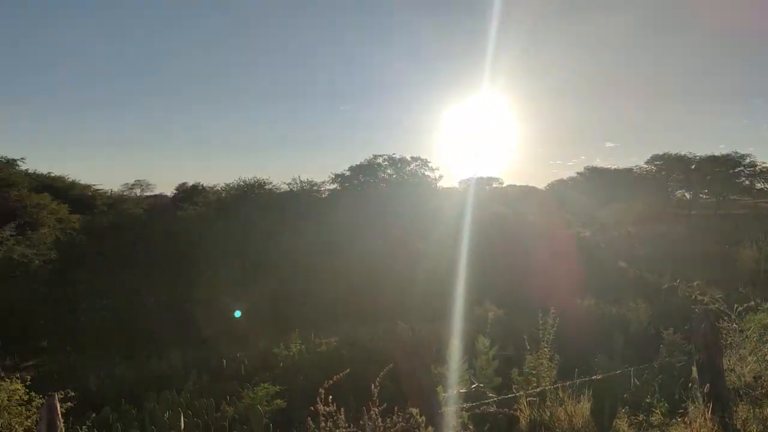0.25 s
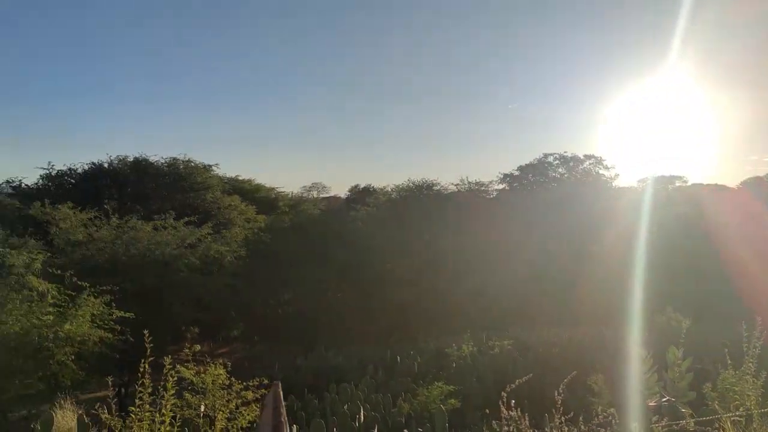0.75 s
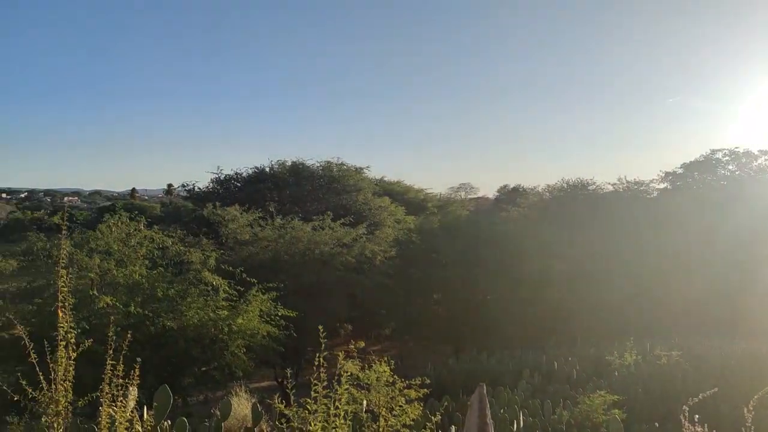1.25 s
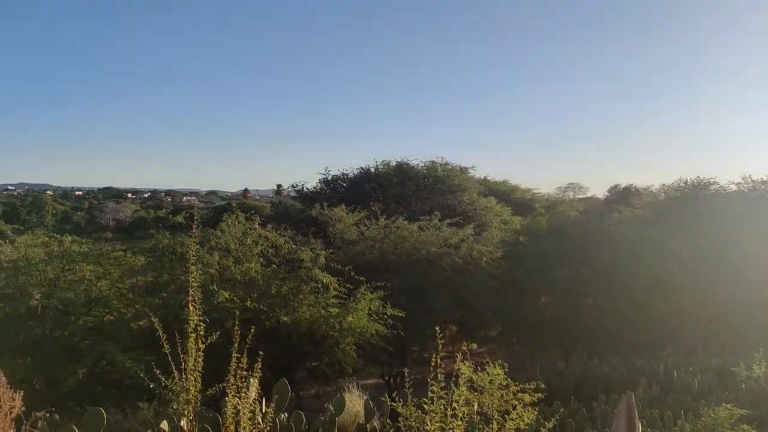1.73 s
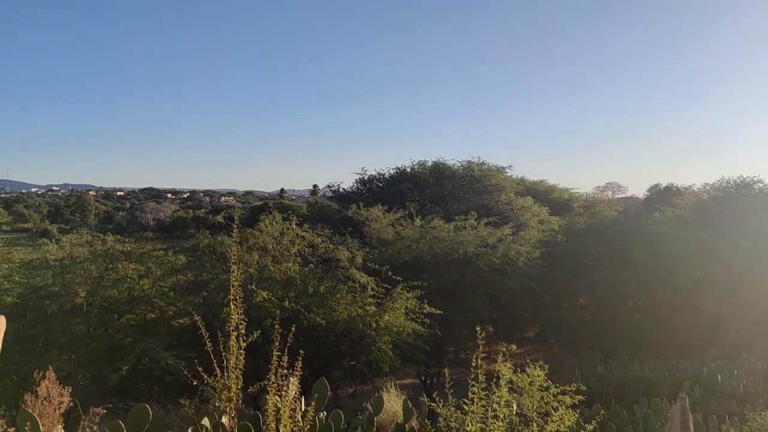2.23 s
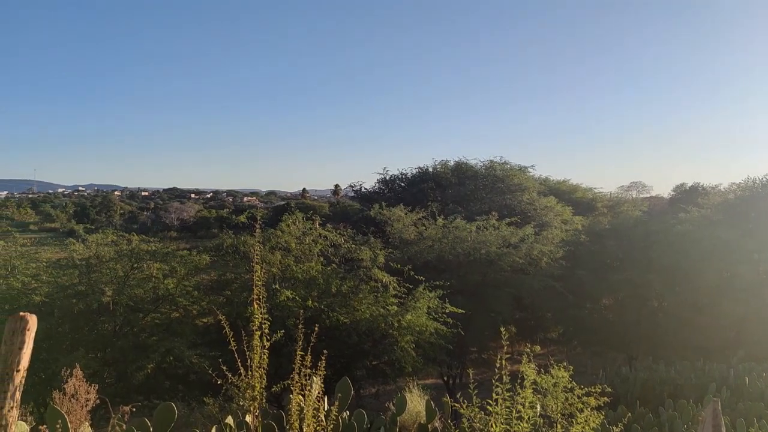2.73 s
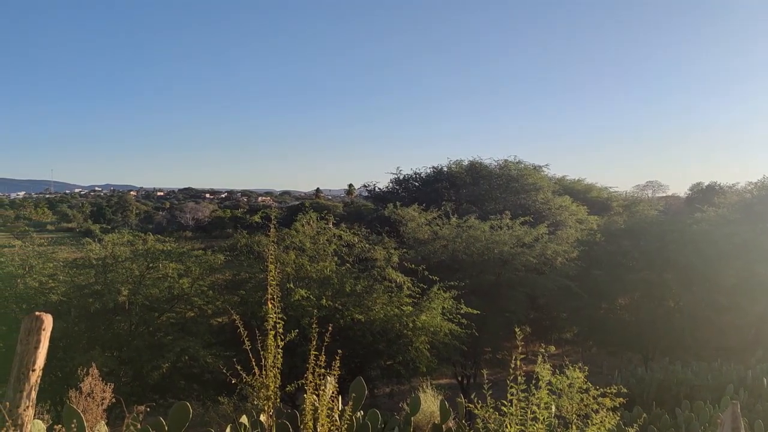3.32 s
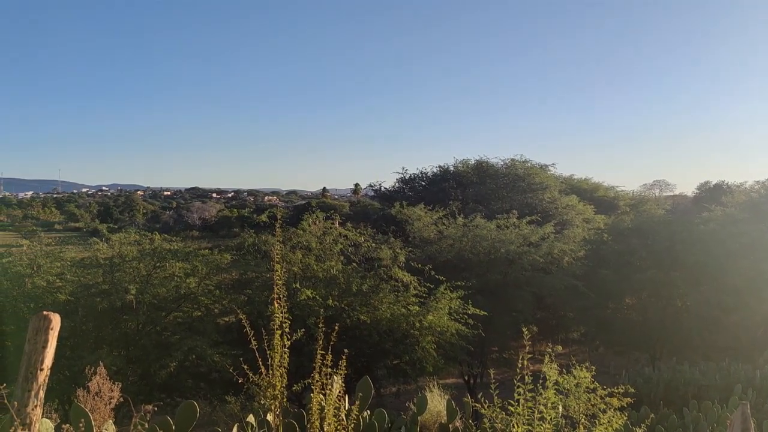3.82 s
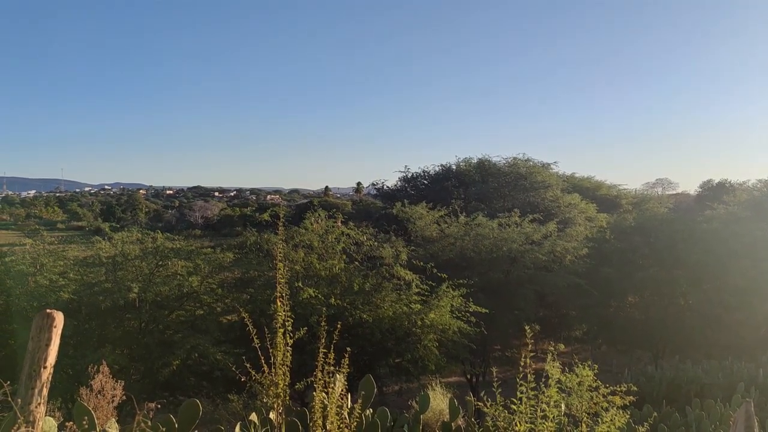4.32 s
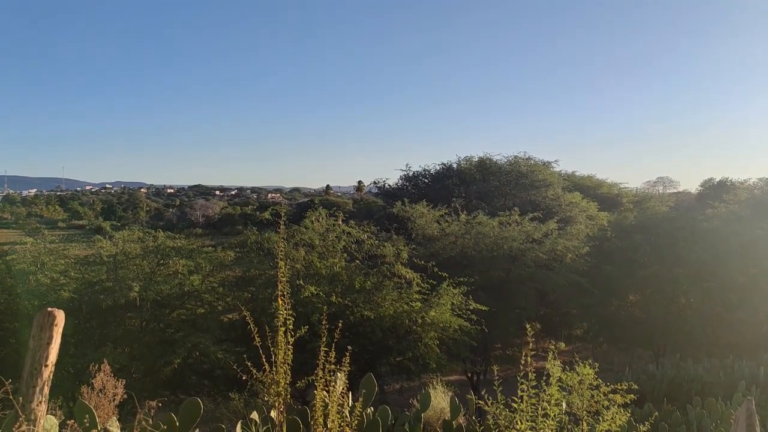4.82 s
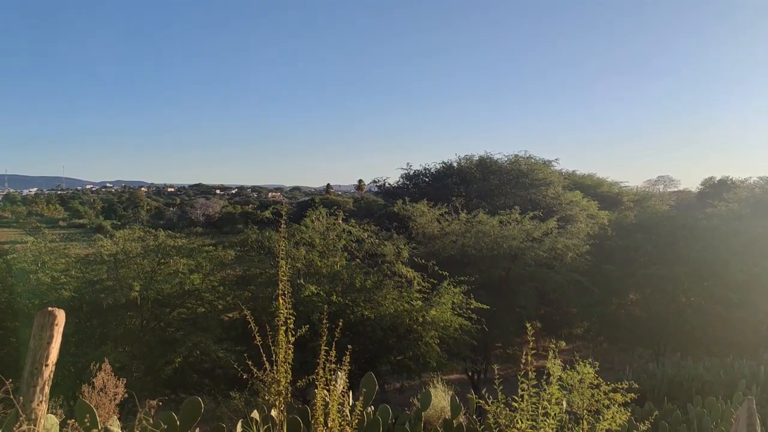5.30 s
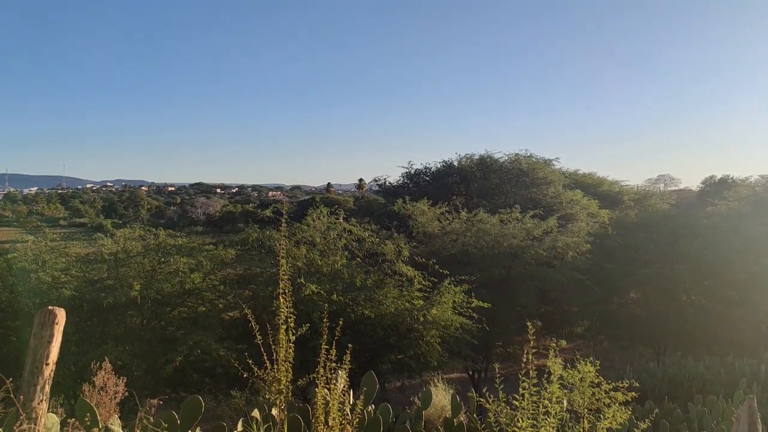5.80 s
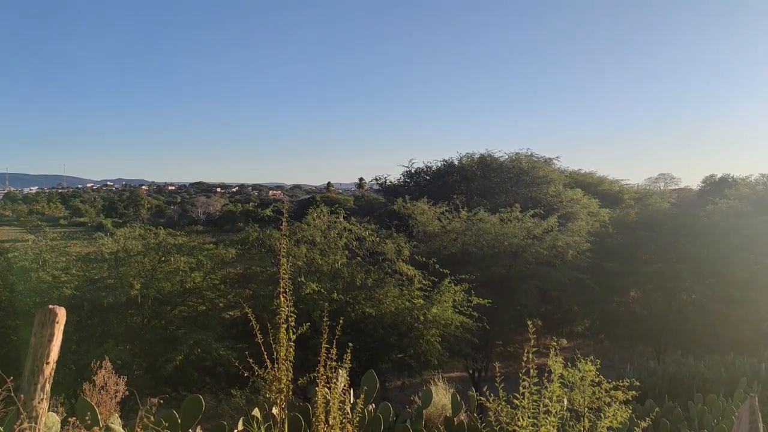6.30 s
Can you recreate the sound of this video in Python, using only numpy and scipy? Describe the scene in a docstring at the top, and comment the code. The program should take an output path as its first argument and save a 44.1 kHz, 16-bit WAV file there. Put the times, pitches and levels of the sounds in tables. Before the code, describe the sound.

Gusty low wind buffeting and small dry clicks at first, then calmer air with mixed bird chirps, arched whistles, buzzy trills and harsh rasps.

```python
"""Wild birds call from the bushes of dry scrubland: arched whistles, slurred chirps, rasps (a syrinx model with
overtones), a buzzy trill of down-sweeps, and far pips and chatter. Foliage scatters every call into a short tail.
Light wind (shaped noise, eddy pulses) buffets the two microphone ports of a hand-held phone over faint wavering hiss.
Dry ticks (damped modes) and a soft rub (noise) sound as it is turned, mostly in the first second or so."""
import sys
import numpy as np
from scipy import signal
from scipy.fft import rfft, irfft
from scipy.io import wavfile

SR = 44100
rng = np.random.default_rng(int(sys.argv[2]) if len(sys.argv) > 2 else 0)


def log_audio(samples):
    """Write samples as a 16-bit WAV file to the path given in sys.argv[1]."""
    # one column per channel
    frames = np.atleast_2d(samples).T
    # limit to full scale, then quantise
    limited = np.clip(frames, -1, 1)
    pcm = np.round(limited * 32767).astype(np.int16)
    wavfile.write(sys.argv[1], SR, pcm)


N = 288855
PORT_LAG = 21  # samples by which the left port hears the far birds later


def undb(db):
    """Decibels to gain."""
    return 10 ** (np.asarray(db) / 20)


def unit(x):
    """Scale to rms 1."""
    return x / np.sqrt(np.mean(x ** 2) + 1e-20)


def ports(db, pan_db):
    """Left and right gain as two rows; pan_db is left minus right."""
    return undb(np.vstack([db + pan_db / 2, db - pan_db / 2]))


def add(out, s, sound):
    """Mix a two-channel sound in at time s."""
    start = int(round(s * SR))
    lo, hi = max(start, 0), min(start + sound.shape[1], N)
    if hi > lo:
        out[:, lo:hi] += sound[:, lo - start:hi - start]


def walk(rate_hz, size):
    """Smooth random wander of spread near 1, with about rate_hz turns a second."""
    knots = rng.standard_normal(int(size * rate_hz / SR) + 4)
    fine = signal.resample_poly(knots, 8, 1)
    fine_pos = np.arange(len(fine)) * len(knots) / len(fine)
    return np.interp(np.arange(size) * rate_hz / SR, fine_pos, fine)


def noise(spectrum):
    """Unrelated noise of rms 1 for each port, coloured by (Hz, dB) points."""
    hz, db = np.transpose(spectrum)
    log_hz = np.log(np.fft.rfftfreq(N, 1 / SR) + 1)
    gain = undb(np.interp(log_hz, np.log(hz), db))
    return unit(irfft(rfft(rng.standard_normal((2, N))) * gain, N))


def fade(t, rise_s, fall_s):
    """Soft onset and release of a note."""
    ramp = np.minimum(t / rise_s, (t[-1] - t) / fall_s)
    return np.sin(np.pi / 2 * np.clip(ramp, 0, 1)) ** 2


def bushes(dry, early_db, early_t60, tail_db, tail_t60, tail_hz, lag=PORT_LAG):
    """A call's energy is shared by direct sound, scatter from near twigs, and a band-passed tail of farther thicket."""
    t = np.arange(SR * 3 // 4) / SR
    out = []
    for side, late in zip(dry, (lag, 0)):
        early, tail = rng.standard_normal((2, len(t)))
        response = undb(early_db) * unit(early * undb(-60 * t / early_t60))
        build_up = 1 - np.exp(-t / 0.034)
        tail = unit(tail * undb(-60 * t / tail_t60) * build_up)
        response += undb(tail_db) * signal.lfilter(*signal.iirpeak(tail_hz, 2, fs=SR), tail)
        direct = np.sinc(t * SR - late - 10)
        heard = signal.fftconvolve(side, response / np.sqrt(len(t)) + direct)
        out.append(heard * np.sqrt(np.sum(side ** 2) / np.sum(heard ** 2)))
    return np.array(out)


def throat(hz):
    """Throat and beak colour the overtones: gain at a frequency."""
    # resonance curve: f/Hz, level/dB
    resonances = [(3900, 7.5), (4450, 5.5), (5200, -13), (5900, -23), (6500, -8), (7000, 0.5), (7500, -10),
                  (8000, -4), (10500, -7)]
    return undb(np.interp(hz, *np.transpose(resonances)))


def calls(table, scatter, open_share, close_share, fall_power, grip, crack, overtones_db, waver, tremble_db,
          buzz_hz, buzz_depth, buzz_swing, calm, rough, hiss_db, rise_s, fall_s):
    """The syrinx cracks open, tightens to a crest and slackens; membrane flutter kicks pitch up as it chokes the note."""
    rest_hz, thicket_hz = 1752, 3170  # slack-syrinx pitch that the pull builds on; band the thicket returns best
    tilt_db = 8  # early crests die away, late ones swell
    jitter = 0.035  # unevenness of the flutter, share of its rate
    out = np.zeros((2, N))
    early_t60, tail_db, tail_t60 = scatter
    for start, crest, end, crest_hz, db, pan_db, lag, low_db, bright_db, twigs_db, harshness in table:
        t = np.arange(int((end - start) * SR)) / SR
        climb = np.clip(1 - t / max(crest - start, 1e-3), 0, 1)
        drop = np.clip((start + t - crest) / max(end - crest, 1e-3), 0, 1)
        pull = 1 - (1 - open_share) * climb ** 2.3 - (1 - close_share) * drop ** fall_power
        hz = rest_hz + (crest_hz - rest_hz) * pull
        tension = hz / crest_hz

        harsh = harshness * np.exp(-calm * drop)  # with calm > 0, dies down after the crest
        flutter = 2 * np.pi * np.cumsum(buzz_hz * (1 + jitter * walk(119.0, len(t)))) / SR
        kick = ((1 - np.sin(flutter)) / 2) ** 2
        swing = buzz_swing * (kick - 1 / 8 + walk(700, len(t)) / 8)
        cracking = crack * climb * walk(1406, len(t))
        hz = hz * (1 + waver * walk(70.7, len(t)) + harsh * (swing + cracking))

        phase = np.pi * np.cumsum(hz) / SR  # fundamental, an octave below the main line
        overtones = sum(undb(h_db + bright_db) * throat(k * hz / 2) * np.sin(k * phase)
                        for k, h_db in enumerate(overtones_db, 3))
        opening = 1 - climb ** 2  # fundamental and overtones open up near the crest
        fundamental = undb(low_db) * opening * tension * np.sin(phase)
        tone = np.sin(2 * phase) + fundamental + opening * tension ** 7 * overtones

        swell_db = tilt_db * ((crest - start) / (end - start) - .5) * t / t[-1]
        level = undb(swell_db + tremble_db * walk(51.0, len(t)))
        effort = tension ** grip * fade(t, rise_s, fall_s) * level
        choke = 1 + np.clip(harsh * buzz_depth, 0, 1) * np.sin(flutter)
        grain = choke * (1 + rough * walk(1600, len(t)) + undb(hiss_db) * walk(9000, len(t)))
        note = ports(db, pan_db) * unit(tone * effort * grain)
        add(out, start, bushes(note, twigs_db, early_t60, tail_db, tail_t60, thicket_hz, lag))
    return out


def rasper():
    """Harsh, flat-topped notes, chopped into a regular rattle of swooping pulses."""
    # rasps: start/s, crest/s, end/s, second harmonic at crest f/Hz, level/dB, left minus right/dB, left lag/samples,
    # fundamental/dB, overtones/dB, twig scatter re direct/dB, harshness/ratio
    rasps = [(-0.07, 0.03, 0.115, 3530, -52.5, 2, 29, -24, -2, 3.5, 0.602),
             (1.515, 1.534, 1.58, 3880, -64, -2, 21, -2, -6, -5, 0.45),
             (2.782, 2.835, 2.893, 3520, -45.5, -1, 21.6, -7.5, 7, -5.5, 0.9),
             (3.02, 3.04, 3.1, 3774, -60, 1, 20, -1, -2, -3, 1.2),
             (4.495, 4.55, 4.592, 3510, -57.5, -0.5, 19, -7.5, 2, -1, 0.88),
             (6.102, 6.158, 6.212, 3510, -44.5, -1, 21.75, -8.5, 10.5, -2.5, 1),
             (6.36, 6.409, 6.465, 3817, -57.5, -2, 18.6, -2.5, 6.5, 1, 1.1),
             (6.527, 6.562, 6.64, 3556, -40, 0, 18, -8, 0, 4.5, 1.8)]
    twigs_t60, tail_db, tail_t60 = 0.07, -6.5, 0.7
    return calls(rasps, (twigs_t60, tail_db, tail_t60), open_share=0.42, close_share=0.263, fall_power=4.5,
                 grip=1, crack=0.085, overtones_db=[-10.5, -15, -52, -39], waver=0.011, tremble_db=0.9,
                 buzz_hz=161, buzz_depth=0.62, buzz_swing=0.145, calm=0, rough=0.19, hiss_db=-28,
                 rise_s=0.023, fall_s=0.0015)


def triller():
    """Bursts of four or five steep down-sweeps; gaps widen along the first two phrases, stay even in the third."""
    # phrases: start/s, syllables, first gap/s, gap growth/s, centre f/Hz, level before trim/dB, left minus right/dB,
    # left lag/samples, sweep period/s, sweep span/Hz, first syllable/dB
    phrases = [(0.0, 6, 0.1131, 0.007, 6370, -62, 5.5, 21, 0.011, 1000, 0),
               (3.734, 9, 0.0999, 0.0041, 6760, -52.8, -1.6, 20, 0.0097, 1300, -2),
               (5.04, 7, 0.1206, 0.0001, 6390, -53.6, 3.7, 22, 0.0108, 1050, -9)]
    sweep_s, count = 0.0092, 4
    step_db, uneven_db, trim_db = -0.2, 1.0, 0.4  # step is per sweep
    out = np.zeros((2, N))
    t = np.arange(int(sweep_s * SR)) / SR
    for start, syllables, gap, slowing, hz, db, pan_db, lag, period, span_hz, first_db in phrases:
        phrase = np.zeros((2, N))
        for n in range(int(round(syllables))):
            s = start + n * gap + slowing * n * (n - 1) / 2
            pace, extra = rng.standard_normal(2)
            draws = rng.standard_normal((count + 1, 3))[:count + (extra > 1)]
            for k, (tune, size, late) in enumerate(draws):
                soft_start_db = first_db * (n == 0) * (1 - k / count)
                sweep_db = db + trim_db + step_db * (k - count / 2) + uneven_db * size + soft_start_db
                pitch_hz = hz + 75 * tune + span_hz * (.5 - t / sweep_s)
                sweep = np.sin(2 * np.pi * np.cumsum(pitch_hz) / SR) * fade(t, 0.0057, 0.0044)
                centre_s = s + period * (k * (1 + 0.028 * pace) + 0.044 * late)
                add(phrase, centre_s - sweep_s / 2, ports(sweep_db, pan_db) * unit(sweep))
        add(out, 0, bushes(phrase, early_db=0.5, early_t60=0.037, tail_db=-12.0, tail_t60=1.0, tail_hz=hz, lag=lag))
    return out


def pip(hz, length_s, slide):
    """A small note that holds its pitch, then droops (slide > 0) or rises."""
    t = np.arange(int(length_s * SR)) / SR
    pitch_hz = hz * (1 - slide * (t / length_s) ** 3)
    return unit(np.sin(2 * np.pi * np.cumsum(pitch_hz) / SR) * fade(t, length_s / 3, length_s / 3))


def far_birds():
    """Paired drooping pips, over the blurred chatter of birds deep in the scrub."""
    # pip pairs of a far bird: t/s, level/dB
    pairs = [(1.544, -64.5), (3.283, -65), (4.4, -64.5), (4.905, -71), (5.429, -67.5), (6.013, -68.5)]
    pair_gap_s, chatter_db = 0.062, -71.5
    pips, chatter = np.zeros((2, 2, N))
    for s, db in pairs:
        for when in (s, s + pair_gap_s):
            add(pips, when, ports(db, 0) * pip(4760, 0.0313, 0.135))
    for when, pitch, length, size, side in rng.random((260, 5)):
        note = pip(1100 + 2600 * pitch ** 1.4, 0.0213 + 0.0243 * length, 0.896 * (side - .3))
        add(chatter, when * N / SR, ports(chatter_db + 4 * (size - .5), 8 * (side - .5)) * note)
    pips = bushes(pips, early_db=2, early_t60=0.11, tail_db=-6, tail_t60=0.5, tail_hz=4500)
    chatter = bushes(chatter, early_db=6, early_t60=0.18, tail_db=4, tail_t60=0.6, tail_hz=2400)
    return (pips + chatter)[:, :N]


def handling():
    """Soft, grainy rubbing noise under the ticks while the phone turns, then very faint."""
    rustle_db, grain_db = -62, 4
    t = np.arange(N) / SR
    turning = np.interp(t, [0, .7, 1.1, 1.4], [0.39, 1, 0.43, 0.024])
    rub = noise([(200, -20), (700, -4.5), (1200, -4.5), (2400, -1.5), (4000, -23.5), (7000, -14.5), (12000, -27)])
    return undb(rustle_db + grain_db * walk(97, N)) * turning * rub


def wind():
    """Turbulence at each port on its own: deep rumble, flutter that grows in gusts, and single eddies."""
    # steady breeze: t/s, left level/dB, right level/dB
    breeze = [(0, -33, -66), (0.35, -36, -43.5), (0.7, -40.5, -35.5), (2.0, -44.5, -44.5),
              (2.65, -50, -47.5), (2.95, -43.5, -43.5), (4.3, -48.5, -52.5), (4.9, -48.5, -48),
              (5.7, -44.5, -51.5), (6.1, -49.5, -55.5), (6.55, -46, -46.5)]
    # gusts on top: t/s, half length/s, left level/dB, right level/dB
    gusts = [(0.183, 0.07, -27, -62), (0.722, 0.067, -50, -31), (0.934, 0.067, -53, -27),
             (1.046, 0.085, -28.5, -26), (1.231, 0.11, -36, -22), (1.469, 0.18, -34.5, -54),
             (3.411, 0.049, -48, -38), (3.753, 0.3, -45, -40.5), (4.037, 0.12, -74, -30.5),
             (4.625, 0.31, -43, -40), (5.185, 0.24, -67, -42.5)]
    # rumble spectrum: f/Hz, relative density/dB
    rumble = [(15, 0), (35, 4), (70, 1), (110, -9.5), (170, -19.5), (300, -41), (600, -86), (2000, -110)]
    # flutter spectrum: f/Hz, relative density/dB
    flutter = [(50, -4), (100, 10), (170, 1.5), (280, -7.5), (420, -22.5), (700, -31.5), (1500, -43),
               (5000, -99)]
    # eddies thumping a port: t/s, f/Hz, peak at the louder port/dB, left minus right/dB
    eddies = [(0.095, 82, -22, 32), (0.154, 100, -19, 34), (0.231, 79.6, -18.5, 30), (0.352, 69, -26.5, 20),
              (0.654, 69, -20, -30), (0.715, 110, -17.5, -27), (0.858, 93, -20, -24),
              (0.921, 84.6, -19.5, -30), (0.953, 111, -15.5, -39), (1.021, 91, -13.5, 28),
              (1.072, 91, -20.5, -19), (1.077, 98, -24.5, 20), (1.097, 107, -20.5, -27),
              (1.146, 80, -21, -3), (1.188, 105, -9.5, -24), (1.217, 164, -8.5, -40),
              (1.252, 136, -16, -40), (1.285, 73, -13, -22), (1.301, 171, -13.5, -39),
              (1.309, 136, -12.5, -39), (1.341, 61, -20, -10), (1.4, 81.6, -20, -26),
              (1.911, 39.8, -24.5, 21), (3.34, 56, -27, -23), (3.7, 22.3, -21.5, 16), (3.963, 84, -26, -30),
              (3.996, 66, -20, -31), (4.036, 76, -21.5, -40), (4.089, 71, -30.5, -32),
              (4.559, 64.5, -29, -24), (4.672, 53, -22.5, -18), (5.644, 46.8, -27.5, 26)]
    unsteady_db, puff_db = 2.04, 5.4
    # flutter re rumble at a wind level of from_db, and its growth per dB of wind
    flutter_base_db, from_db, growth_per_db = -7, -24.5, 0.91
    t = np.arange(N) / SR
    times, *sides = np.transpose(breeze)
    power = undb([np.interp(t, times, side) for side in sides]) ** 2
    for s, half_s, left_db, right_db in gusts:
        power += (undb([[left_db], [right_db]]) * np.exp(-((t - s) / half_s) ** 2)) ** 2
    db = 10 * np.log10(power) + unsteady_db * np.array([walk(11, N), walk(14, N)])
    flutter_db = flutter_base_db + growth_per_db * (db - from_db)
    puffs = undb(puff_db * np.array([walk(45, N), walk(45, N)]))
    out = undb(db) * (noise(rumble) + undb(flutter_db) * unit(noise(flutter) * puffs))
    t = np.arange(-SR // 20, SR // 20) / SR
    for s, hz, peak_db, side_db in eddies:
        passing = (np.pi * hz * t) ** 2
        pulse = (1 - 3 * passing) / (1 + passing) ** 3  # pressure peak between two dips
        add(out, s + t[0], ports(peak_db - abs(side_db) / 2, side_db) * pulse)
    return out


def background_hiss():
    """Faint steady background hiss whose bands waver at random, the lows partly alike at both ports."""
    # hiss spectrum: f/Hz, relative density/dB
    hiss_spectrum = [(200, -23.5), (450, -24), (700, -28.5), (1300, -34), (2000, -33), (2900, -37),
                     (4100, -33), (5200, -31.5), (5800, -36), (6500, -31), (8500, -45), (11500, -45.5),
                     (13500, -38), (15300, -34.5)]
    level_db, patchy_db, shared = -64.5, 3.0, 0.14
    hz = np.fft.rfftfreq(N, 1 / SR)
    spectrum = rfft(noise(hiss_spectrum))
    alike = np.clip(shared, 0, 1) / (1 + (hz / 900) ** 2)
    spectrum = np.sqrt(1 - alike) * spectrum + np.sqrt(alike) * rfft(noise(hiss_spectrum)[0])
    edges_hz = np.geomspace(100, SR / 2, 24)
    out = np.zeros((2, N))
    for lo, hi in zip(edges_hz, edges_hz[1:]):
        band = irfft(spectrum * ((hz >= lo) & (hz < hi)), N)
        out += band * undb(patchy_db * walk(18, N))
    return undb(level_db) * out


def ticks():
    """Each tick rings damped modes, higher or lower with the spot that is touched, plus a short snap of noise."""
    # ticks: t/s, ring peak midway between ports/dB, snap re ring/dB, pitch re modes/ratio
    touches = [(0.044, -45, -19, 1.02), (0.216, -41, -16, 1.13), (0.251, -38, -30, 1.08),
               (0.293, -39, -9, 1.02), (0.311, -41.5, -25, 1.1), (0.452, -48, -25, 1.2),
               (0.521, -39, -13, 0.95), (0.545, -40.5, -12.5, 1), (0.613, -43, -28, 0.98),
               (0.639, -36, -24, 1.1), (0.684, -24.5, -45, 0.97), (0.735, -37.5, -16, 0.54),
               (0.746, -45.5, -20, 0.58), (0.834, -40.5, -35, 1.08), (0.889, -38.5, -11, 0.91),
               (0.949, -42, -32, 1.17), (0.99, -39.5, -23, 0.72), (1.039, -40.5, -28, 1.5),
               (1.053, -41, -21, 1.3), (1.082, -51, -26, 0.92), (1.14, -43, -18, 0.8)]
    # ringing modes ahead of the contact filter: f/Hz, t60/s, level/dB
    modes = [(795, 0.074, -11.5), (1220, 0.0095, 10), (1570, 0.0011, -20), (2450, 0.0096, 1)]
    pan_db, snap_t60, knee_hz = -5, 0.067, 3000
    out = np.zeros((2, N))
    t = np.arange(SR // 30) / SR
    treble = signal.butter(3, [3000, 5200], "band", fs=SR, output="sos")
    for s, db, snap_db, pitch in touches:
        soft_contact = signal.butter(5, [650 * pitch, knee_hz], "band", fs=SR, output="sos")
        ring = np.zeros(len(t))
        for hz, t60, mode_db in modes:
            mode_hz = hz * pitch * (1 + 0.13 * rng.standard_normal())
            ring += undb(mode_db - 60 * t / t60) * np.sin(2 * np.pi * mode_hz * t)
        ring = signal.sosfilt(soft_contact, ring)
        snap = signal.sosfilt(treble, rng.standard_normal(len(t)) * undb(-60 * t / snap_t60))
        tick = ring / abs(ring).max() + undb(snap_db) * snap / abs(snap).max()
        add(out, s, ports(db, pan_db) * tick)
    return out


def chirper():
    """Quick up-and-down slurs with a scratchy start and a cleaner fall."""
    # chirps: start/s, crest/s, end/s, second harmonic at crest f/Hz, level/dB, left minus right/dB, left lag/samples,
    # fundamental/dB, overtones/dB, twig scatter re direct/dB, harshness/ratio
    chirps = [(0.05, 0.065, 0.142, 3440, -57.5, -1, 23, -8, 8, -6, 1.48),
              (0.301, 0.326, 0.403, 3410, -39.5, -2.5, 25.9, -19, 18, -4, 1.58),
              (0.385, 0.435, 0.495, 3254, -54, 0, 23, -6.5, 17, 2, 1.64),
              (0.718, 0.745, 0.785, 3160, -52, 4, 14, -28, 5, 7, 4.52),
              (1.985, 2.055, 2.118, 2890, -59.5, 2, 23.5, -6, -8, 3, 3.2),
              (2.42, 2.45, 2.525, 2966, -62.5, 8, 29, -14, -10, 6, 1),
              (3.212, 3.234, 3.317, 3308, -46.5, -1.5, 23, -7.5, 21, -6.5, 1.3),
              (3.928, 3.947, 4.04, 3447, -56, 2, 22.5, -14, 6, -0.5, 0.77),
              (4.89, 4.903, 4.965, 3740, -57, -1.5, 21, -4.5, 15, -1.5, 1.5),
              (5.612, 5.642, 5.7, 2915, -54.5, 2, 22, -13.5, -16, -6, 1.55)]
    twigs_t60, tail_db, tail_t60 = 0.09, -7.0, 0.94
    return calls(chirps, (twigs_t60, tail_db, tail_t60), open_share=0.345, close_share=0.131, fall_power=1.6,
                 grip=0.23, crack=0.045, overtones_db=[-30, -27], waver=0.0082, tremble_db=2.0,
                 buzz_hz=180.0, buzz_depth=0.35, buzz_swing=0.06, calm=2, rough=0.16, hiss_db=-20.5,
                 rise_s=0.012, fall_s=0.0069)


def whistler():
    """Long, slightly trembling arches."""
    # whistles: start/s, crest/s, end/s, second harmonic at crest f/Hz, level/dB, left minus right/dB,
    # left lag/samples, fundamental/dB, overtones/dB, twig scatter re direct/dB, harshness/ratio
    whistles = [(0.5, 0.655, 0.762, 2579, -50, -6, 20.9, -8.5, -6.5, -5, 0.99),
                (0.915, 1.047, 1.16, 2952, -59, 4.5, 14.5, -6.5, -17, -4.5, 1.4),
                (2.63, 2.674, 2.8, 2440, -63.5, 4, 19.6, -34, -27, -1, 0.41),
                (3.405, 3.58, 3.68, 2590, -53, -6, 23.5, -6.5, 0.5, -3, 1.495),
                (3.555, 3.63, 3.8, 2660, -61.5, 9, 15, -16, -7, 10, 5.6),
                (4.158, 4.228, 4.385, 2980, -60, 1, 21.9, -18, -4, -7, 1.25),
                (4.7, 4.77, 4.82, 2105, -65.5, 2.5, 19.4, -2, -15, -3.5, 1),
                (5.048, 5.2, 5.295, 2957, -54.5, -3, 21.6, -8.5, -22, -7, 0.85),
                (5.76, 5.78, 5.87, 2090, -66, 10, 22.5, -33, -15, -15, 0.76),
                (5.775, 5.87, 5.995, 2466, -54.5, 0.5, 17, -37, -17, 3, 1.32)]
    twigs_t60, tail_db, tail_t60 = 0.14, -12, 0.97
    return calls(whistles, (twigs_t60, tail_db, tail_t60), open_share=0.23, close_share=0.13, fall_power=3.5,
                 grip=0.43, crack=0.0029, overtones_db=[-16.5, -32], waver=0.006, tremble_db=2.0,
                 buzz_hz=90.4, buzz_depth=0.12, buzz_swing=0.0198, calm=0, rough=0.1, hiss_db=-21,
                 rise_s=0.025, fall_s=0.035)


def scene():
    """Birds, handling, wind and background hiss at the two ports."""
    birds = rasper() + triller() + far_birds() + chirper() + whistler()
    return birds + handling() + wind() + background_hiss() + ticks()


def record(dry):
    """The phone cuts the top: steep elliptic low-pass."""
    top_hz = 15800
    return signal.sosfilt(signal.ellip(10, .2, 70, top_hz, fs=SR, output="sos"), dry)


dry = scene()
out = record(dry)
log_audio(out)
```